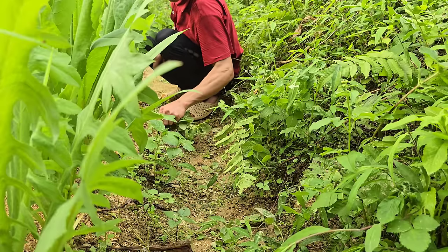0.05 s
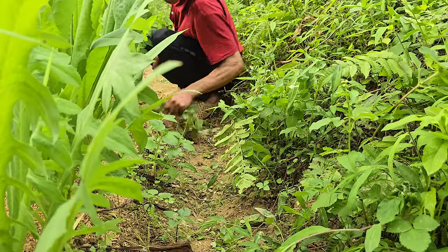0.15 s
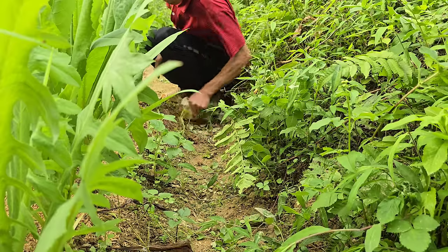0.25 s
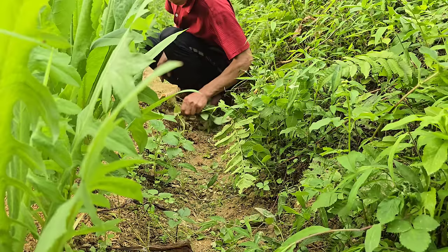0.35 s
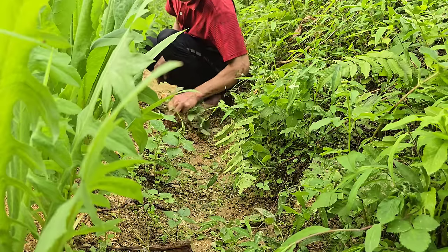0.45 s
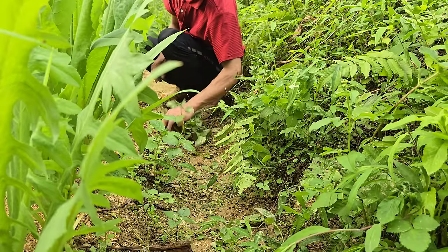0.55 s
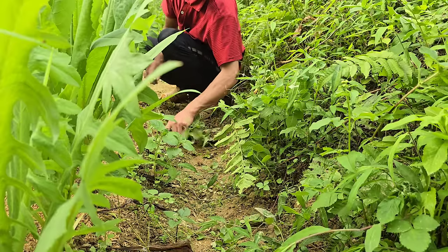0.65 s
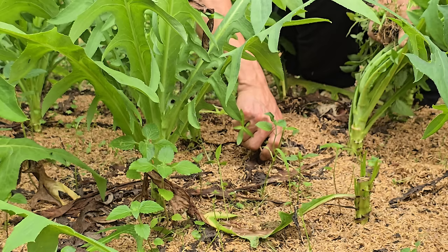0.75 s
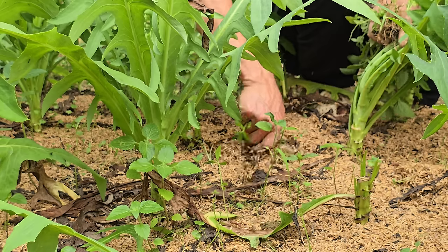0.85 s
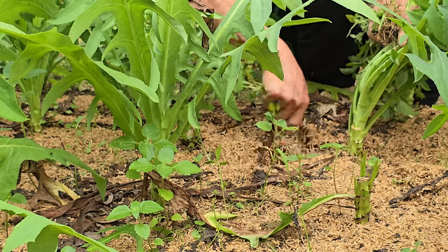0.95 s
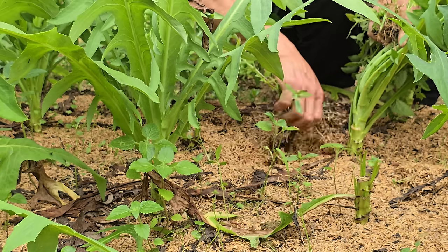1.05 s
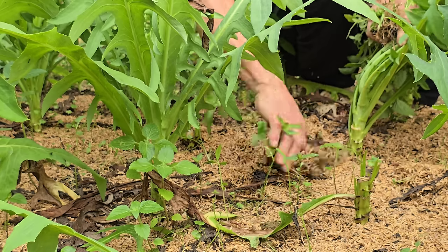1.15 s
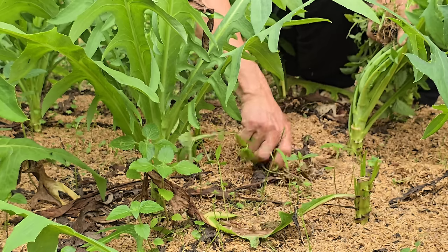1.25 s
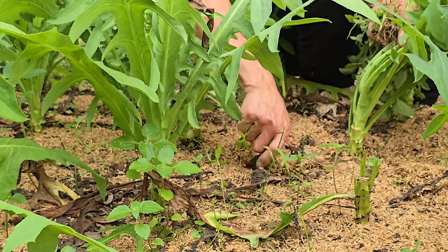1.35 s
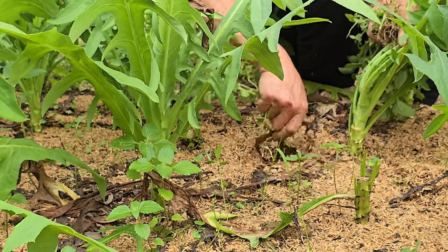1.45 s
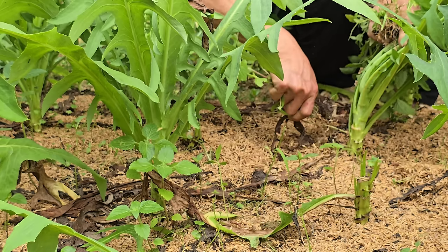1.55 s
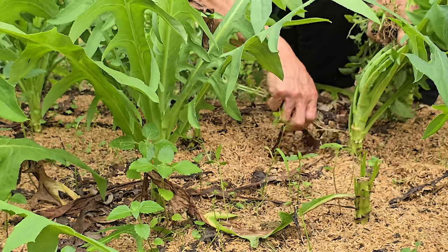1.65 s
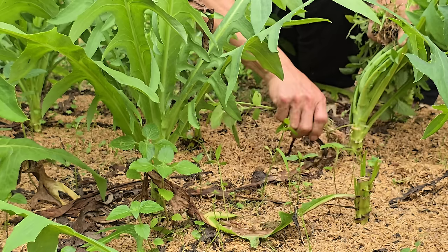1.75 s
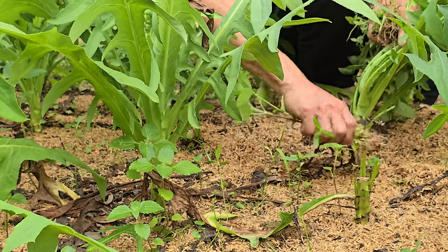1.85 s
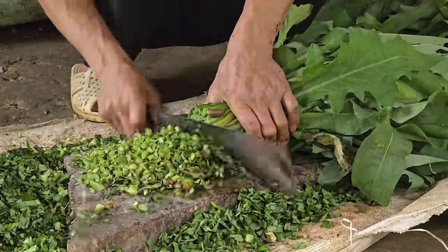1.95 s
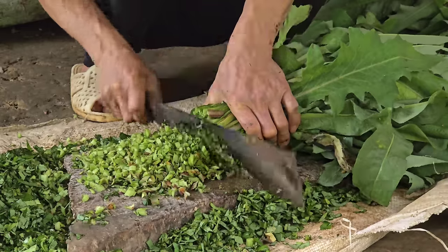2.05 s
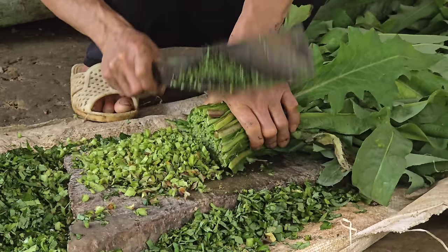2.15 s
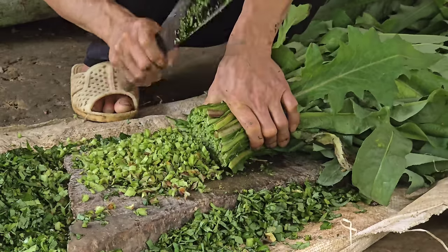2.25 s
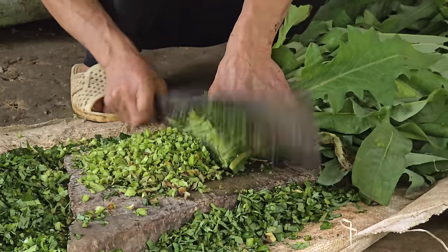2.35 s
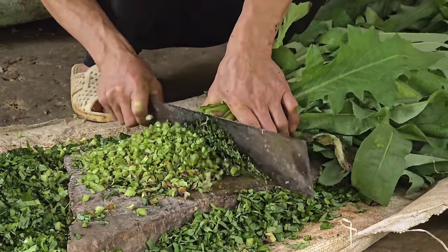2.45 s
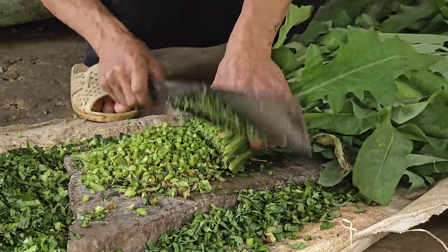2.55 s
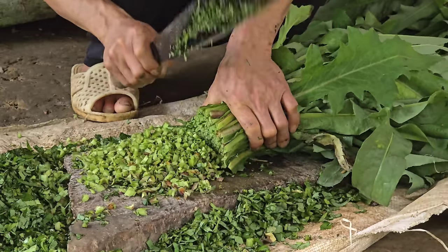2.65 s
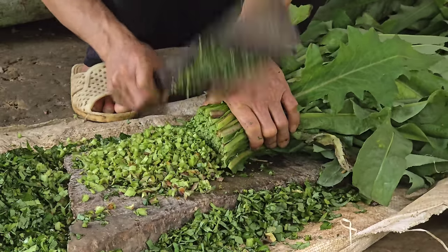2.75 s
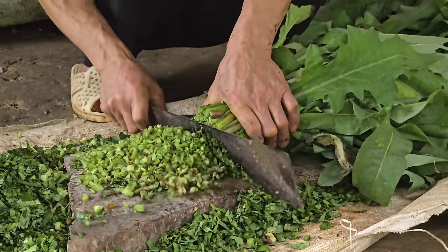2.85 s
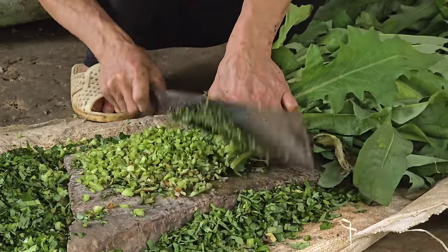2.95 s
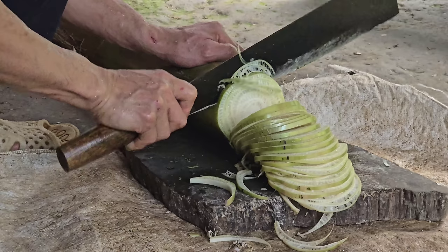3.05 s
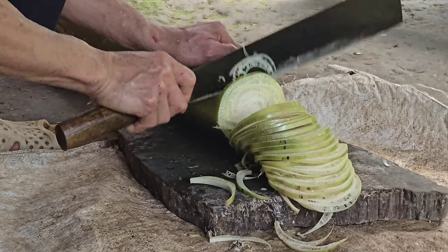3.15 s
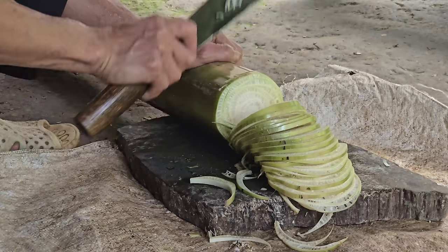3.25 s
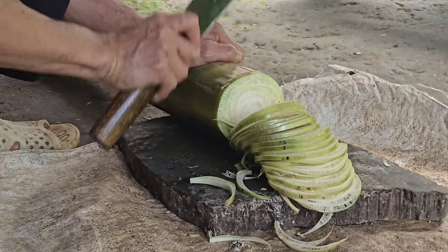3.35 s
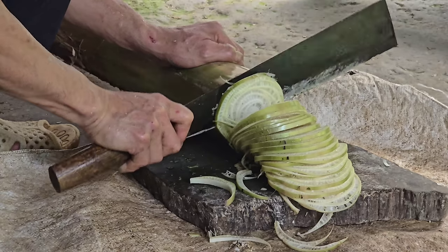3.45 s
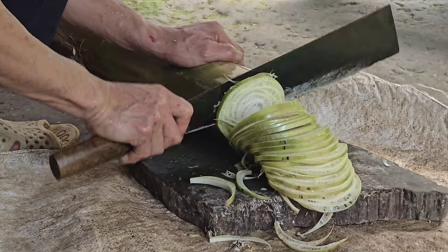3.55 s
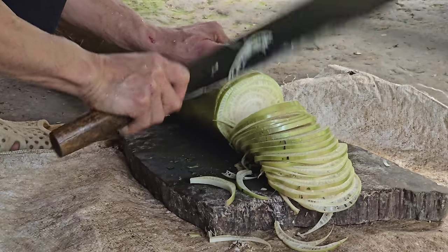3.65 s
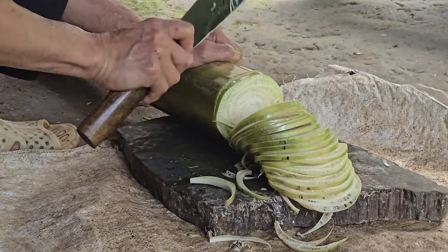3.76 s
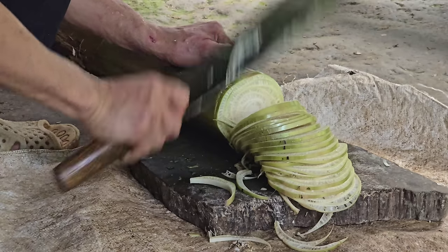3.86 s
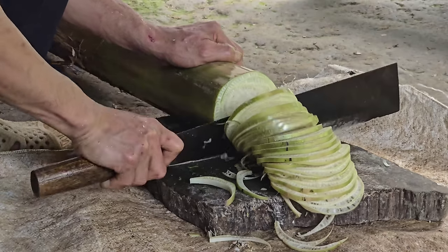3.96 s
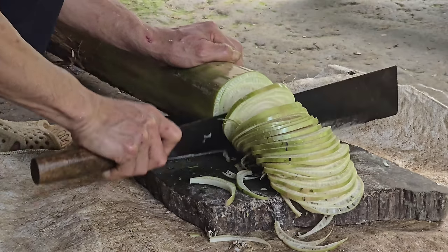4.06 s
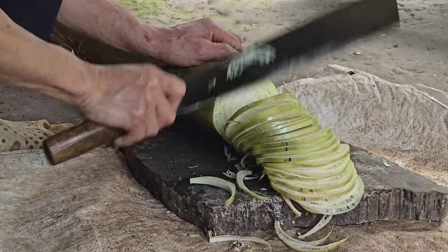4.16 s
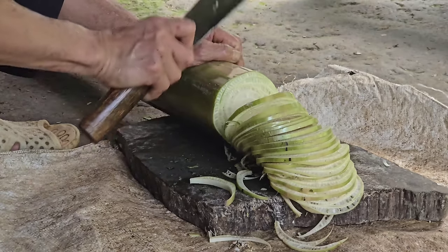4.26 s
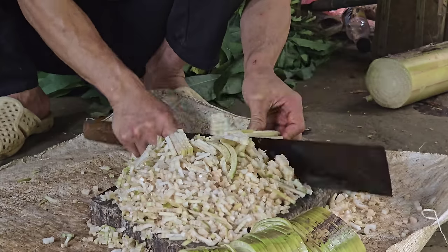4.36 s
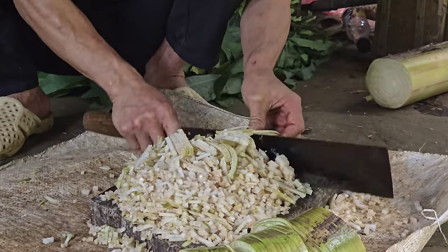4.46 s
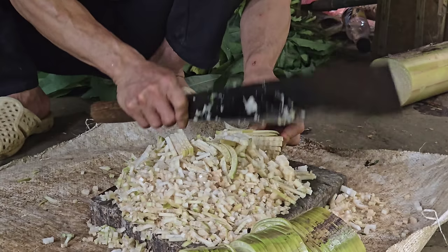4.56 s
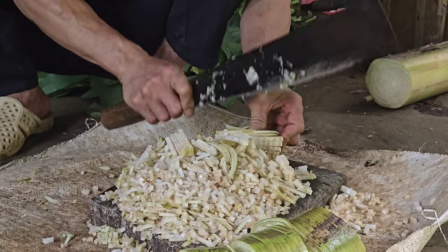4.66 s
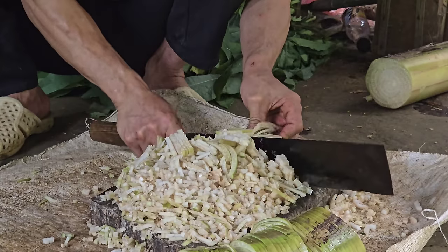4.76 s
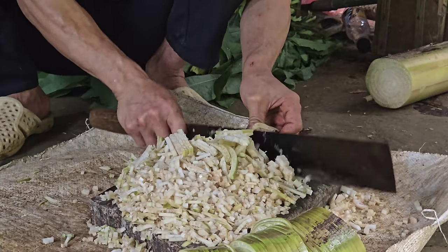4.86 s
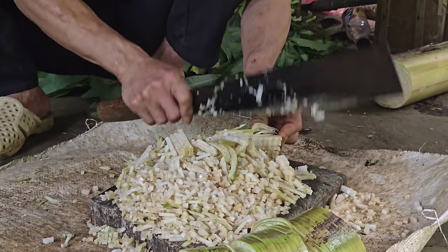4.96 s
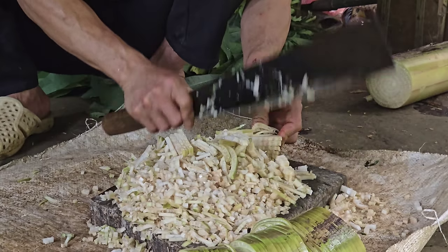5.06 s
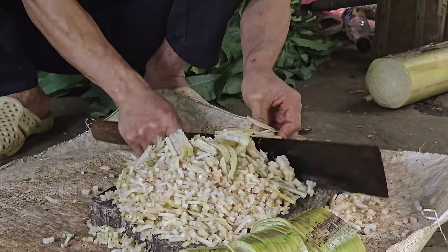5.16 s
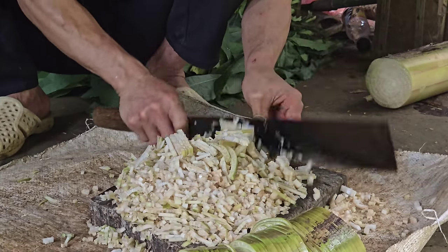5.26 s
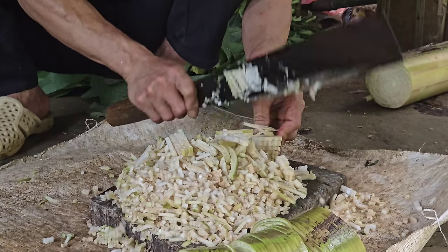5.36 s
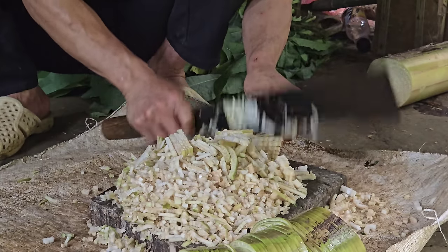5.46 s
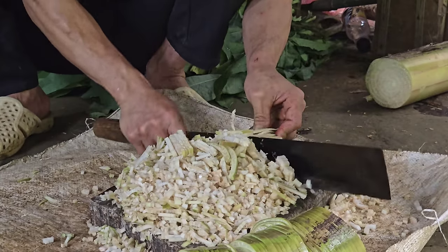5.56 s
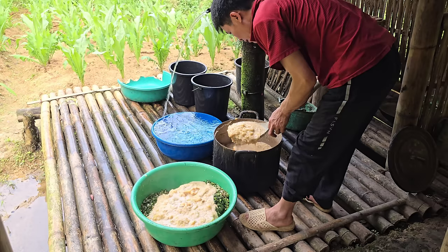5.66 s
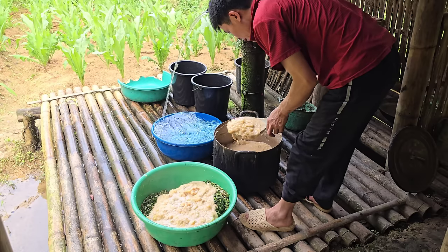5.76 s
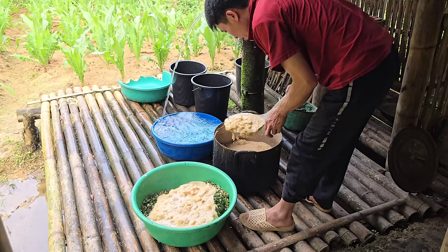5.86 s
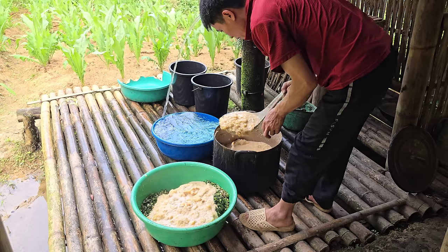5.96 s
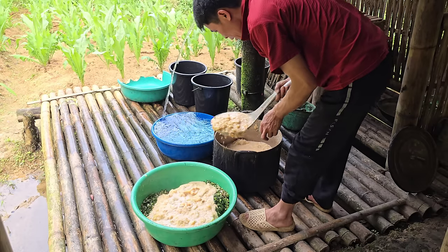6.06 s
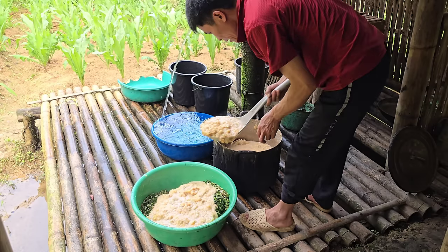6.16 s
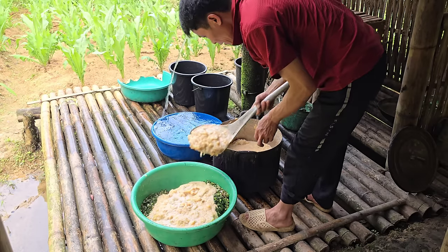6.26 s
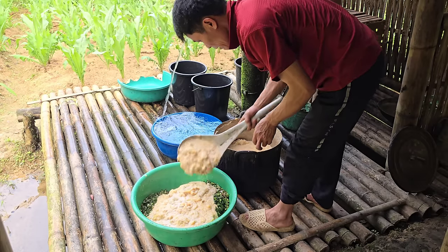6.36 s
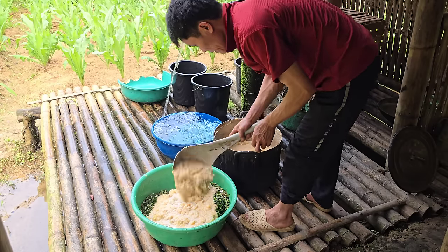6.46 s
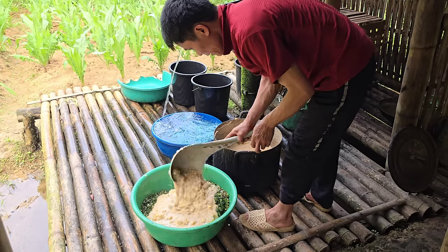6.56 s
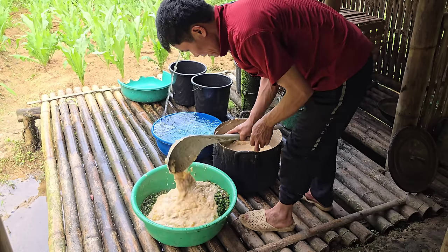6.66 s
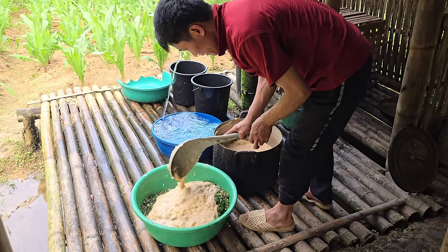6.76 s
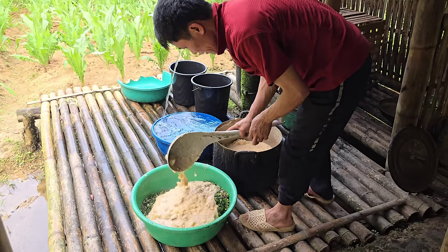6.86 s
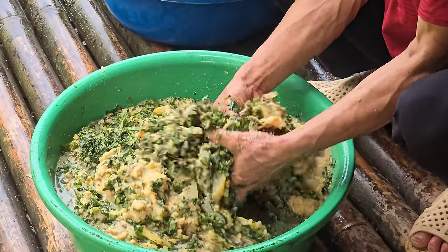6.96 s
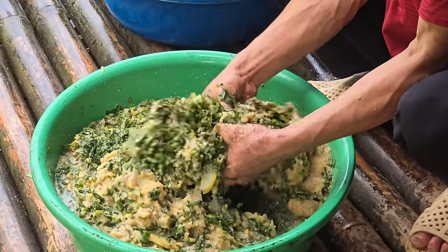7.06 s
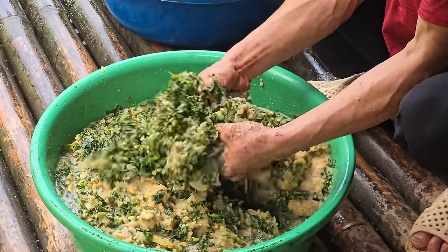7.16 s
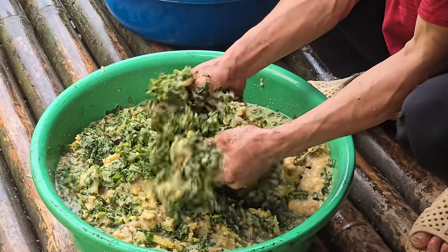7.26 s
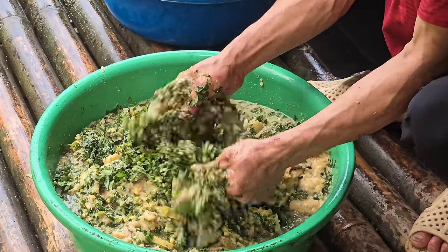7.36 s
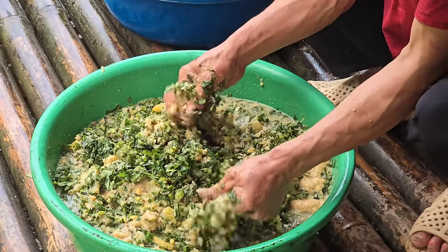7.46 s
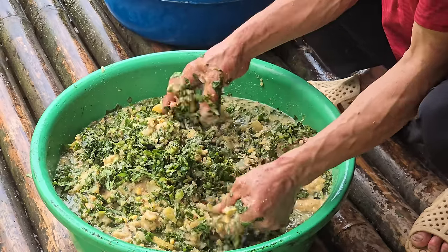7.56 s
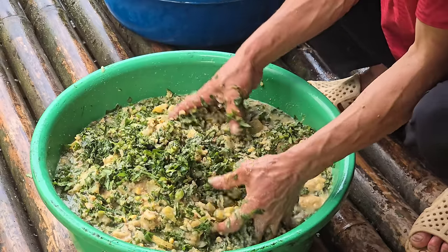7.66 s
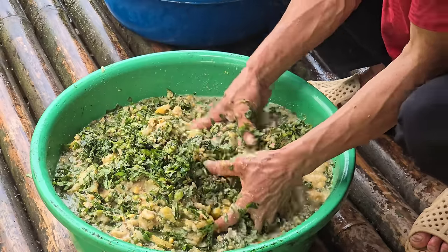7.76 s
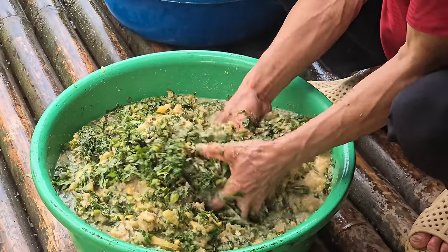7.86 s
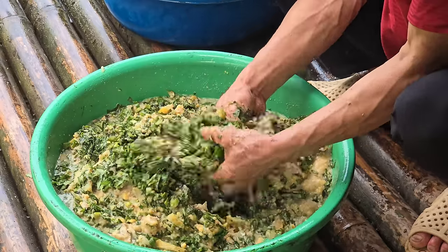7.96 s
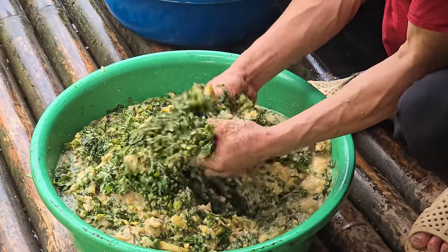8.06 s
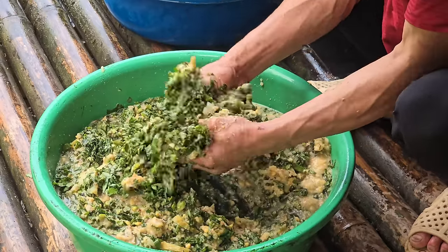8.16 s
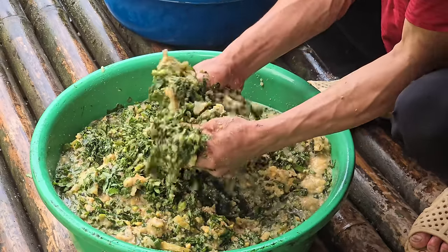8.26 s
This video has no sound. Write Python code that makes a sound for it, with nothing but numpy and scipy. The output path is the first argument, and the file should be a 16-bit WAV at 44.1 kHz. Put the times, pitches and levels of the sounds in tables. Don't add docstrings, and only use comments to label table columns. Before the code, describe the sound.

Weeds rustle among shrilling insects, then a cleaver knocks hard on wooden blocks through leaves and stem, before hands squelch wet mash in a plastic basin.

```python
import sys
import numpy as np
from scipy import signal
from scipy.fft import rfft, irfft, next_fast_len
from scipy.io import wavfile
from scipy.ndimage import uniform_filter1d, map_coordinates

SR = 44100
rng = np.random.default_rng(int(sys.argv[2]) if len(sys.argv) > 2 else 0)


def boost_factor(decibels):
    exponent = np.asarray(decibels, float) / 20
    return 10 ** exponent


def generate_wav(signal):
    frames = np.transpose(np.atleast_2d(signal))
    scaled = np.clip(frames, -1, 1) * 32767
    pcm = np.round(scaled).astype(np.int16)
    wavfile.write(sys.argv[1], SR, pcm)


N = 366471

# [start t/s, spectrum [f/Hz, level/dB per Hz]]
PLACES = [
    (0, [(13, -42), (22, 8.5), (139, -3), (742, -15.5), (2230, -19.5), (4400, -25), (9060, -19), (13500, -33.5)]),
    (.9, [(45, -16), (108, -27), (193, -2.5), (344, -8.5), (1250, -2), (3020, -9.5), (4310, -17), (15700, -29)]),
    (2.14, [(13, -41.5), (22, -14), (247, -6), (417, -14.5), (1220, -22.5), (1600, -18), (2500, -12.5), (15700, -19.5)]),
    (3.24, [(13, -47.5), (76, 3), (168, -0.5), (373, -11), (900, -18), (3100, -21.5), (5680, -30), (15700, -38.5)]),
    (4.6, [(22, -52), (118, -13), (247, -8.5), (335, -18.5), (630, -21), (1060, -21), (3660, -17), (15700, -23.5)]),
    (5.75, [(22, -38), (108, -49), (168, -37), (198, -1), (284, -10.5), (665, -5), (2000, -8.5), (15700, -29)]),
    (7.085, [(22, -48), (128, -15.5), (241, 0.5), (453, -15), (1400, -13.5), (5370, -16.5), (6510, -21.5), (11900, -21)]),
]
# [t/s, peak level/dB, rattle level/dB, edge click level/dB, thump level/dB]
LEAF_BLOWS = [(2.0307, -5.5, -11, -8.5, -17), (2.8960, 0, -13.5, -32, -20)]
STEM_BLOWS = [(3.5158, -19, 1, -32, -8), (4.0012, -1.5, -9.5, -16, -14)]
MINCE_BLOWS = [(4.485, -9.5, -7.5, -30, -10), (4.8702, -16.5, -12, -21, -29),
               (4.8727, -1.2, -14.5, -13, -24.5), (5.2406, -17.5, -10, -23, -29),
               (5.2454, 0.8, -11.5, -20.5, -23.5), (5.6147, -22, -9, -27, -31),
               (5.6214, -0.1, -13, -29, -31)]
# [t/s, level/dB]
EFFORT = [(5.75, -60), (5.85, -52), (7.075, -51), (7.095, -41), (7.6, -42), (7.75, -40), (7.88, -43),
          (8.31, -41)]
LADLING_S, KNEADING_S = EFFORT[0][0], PLACES[-1][0]


def chopping():
    # [t/s, peak level/dB, rattle level/dB, edge click level/dB, thump level/dB]
    twig_blows = [(.2195, -26, -6.5, 3, -8)]
    # [f/Hz, width/Hz, level/dB]
    leaf_block = [(300, 7.2, 0), (460, 100, 4.5), (750, 34, 3.5), (953, 87, -1), (1180, 240, -5.5),
                  (1510, 23, -8), (1650, 30, -13), (2050, 46, -13), (2260, 77, -12.5), (2800, 49, -13),
                  (3540, 90, -25)]
    stem_block = [(137, 10, -8), (524, 19, -4.5), (857, 8.1, -6), (1010, 9.4, -22.5), (1100, 66, -11.5),
                  (1400, 180, -13.5), (1600, 20, -38), (1975, 26, -25), (2200, 35, -30.5), (3750, 34, -44)]
    mince_block = [(426, 18, 0), (569, 17.4, 7), (735, 6.7, -11), (847, 69, -13.5), (1032, 16, -2),
                   (1314, 74, -7), (1527, 66, -16), (2000, 14, -27), (2200, 8.7, -24), (2330, 18, -17.5),
                   (2640, 20, -32), (2900, 25, -16.5), (3600, 40, -31.5), (3840, 32, -28.5)]
    twig = knocks(twig_blows, leaf_block, t60=0.035, harder_db=28)
    leaves = knocks(LEAF_BLOWS, leaf_block, t60=0.15)
    stem = knocks(STEM_BLOWS, stem_block, t60=0.11)
    mince = knocks(MINCE_BLOWS, mince_block, t60=0.11)
    return twig + leaves + stem + mince


def knocks(blows, block, t60, harder_db=0):
    out, t = np.zeros((2, N)), np.arange(SR // 4) / SR
    hard_hz, softer = 9000, 1.27

    def wood(f):
        modes = sum((-1) ** k * boost_factor(db) * resonance(hz, width + 30)(f) for k, (hz, width, db) in enumerate(block))
        crack = boost_factor(-32) * resonance(2400, 2200)(f) ** 2
        return modes + crack

    for s, db, rattle_db, click_db, thump_db in blows:
        noise = rng.standard_normal((3, len(t)))
        own = filtered(noise[:2], lambda hz: hz / (hz + 2000))
        uneven = lumps(106, 1.6, count=len(t))
        late = 1 - np.exp(-t / .006)
        rattle = noise[2] + 4.7 * own * boost_factor(-30 * t / t60)
        push = boost_factor(rattle_db - 13.0 - 60 * t / t60) * late * uneven * rattle
        push[:, 0] += 1
        dull_hz = hard_hz * boost_factor(softer * (db + harder_db))
        ring = filtered(push, lambda f: wood(f) / (1 + 1j * f / dull_hz) ** 2)
        click = boost_factor(click_db - 60 * t / .012) * filtered(own, resonance(2800, 3000))
        thump = late * boost_factor(thump_db - 60 * t / 0.059) * np.sin(2 * np.pi * 115 * t * (1 - 3.2 * t))
        add(out, s, boost_factor(db) * (ring / np.abs(ring).max() + click + thump))
    return out


def crunch():
    # [t/s, length/s, level/dB, brightness/dB per octave, fade t60/s]
    cuts = [(2.019, 0.015, -26.5, -5.5, 0.29), (2.441, 0.027, -22, -0.5, 0.12),
            (2.884, 0.0082, -22, -4, 0.14), (3.518, 0.02, -16.5, 1, 0.13), (4.494, 0.031, -16, 1, 0.12)]
    rustles = [(.54, 0.016, -46.5, 3, 0.15), (0.728, 0.054, -66, -1, .15), (1.28, .052, -42.5, 1.5, .15),
               (1.484, 0.0188, -44.5, 1, .04), (2.281, 0.064, -61.5, -5.5, .11), (2.413, .03, -50, 2, .05),
               (3.481, 0.031, -44, 0.5, .05), (3.95, 0.028, -37.5, -4, 0.053),
               (4.003, 0.028, -31.5, -4.2, 0.16), (4.287, 0.033, -49.5, -3.5, .11),
               (4.436, 0.064, -37, -2, .05), (4.832, .012, -40, -0.5, .05),
               (5.21, 0.0094, -36.5, -0.5, .05), (5.587, 0.0083, -42.5, -0.5, 0.046)]
    bites = [(3.977, 0.02, -17.5, 0, 0.11), (4.839, .033, -29.5, -1.5, .12), (5.22, 0.02, -33.5, -2.5, .15),
             (5.592, 0.028, -35, -1, .093)]
    # [f/Hz, level/dB per Hz]
    cells = [(35, -38.5), (60, -29), (163, -5), (299, -5), (561, -3.5), (959, -9), (1490, -5.5),
             (2270, -12), (3070, -10), (4460, -12.5), (15700, -15)]
    swell, bite = 0.66, 0.24
    spray_hz, spray_shorter = 3000, 0.88
    out, t = np.zeros((2, N)), np.arange(SR // 5) / SR
    rows = [(*row, swell) for row in cuts + rustles] + [(*row, bite) for row in bites]
    for s, length, db, bright_db, t60, rise in rows:
        grain = boost_factor(1.5 * rng.standard_normal(len(t) // 40 + 1).repeat(40)[:len(t)])

        def colour(hz):
            return boost_factor(along(cells, hz) + bright_db * np.log2((hz + 300) / 3000))

        def shape(life):
            return np.clip(t / (rise * length), 0, 1) * boost_factor(-60 * np.maximum(t - length, 0) / life)

        pair = filtered(grain * rng.standard_normal((2, len(t))), colour)
        low = filtered(pair, lambda hz: 1 / (1 + (hz / 1500) ** 2))
        both = unit(pair - low + 0.56 * low.mean(0))
        body = filtered(both, lambda hz: 1 / (1 + (hz / spray_hz) ** 4))
        spray = both - body
        add(out, s, boost_factor(db) * (shape(t60) * body + shape(spray_shorter * t60) * spray))
    return out


def mash():
    out, t = np.zeros((2, N)), np.arange(SR // 8) / SR
    for s, db, hz, t60, width in squelches():
        noise = rng.standard_normal((3, len(t)))
        tone = .32 * np.sin(2 * np.pi * hz * t * (1 + 1.5 * t))
        burst = (tone + noise[2] + .6 * noise[:2]) * lumps(200, 3, count=len(t))
        burst = burst * np.clip(t / .002, 0, 1) * boost_factor(-60 * t / t60)
        burst[:, round(.003 * SR)] += 7 * noise[:2, 0]
        sound = filtered(burst, lambda f: resonance(hz, width)(f) + 0.088 * resonance(1.3 * hz, 2200)(f))
        add(out, s - .003, boost_factor(db - 2.5) * sound / np.abs(sound).max())
    add(out, LADLING_S, boost_factor(-0.3) * gurgle(LADLING_S, KNEADING_S, broader=3.7))
    add(out, KNEADING_S, boost_factor(1.1) * gurgle(KNEADING_S, N / SR, broader=1))
    return out


def squelches():
    # [t/s, peak level/dB, f/Hz]
    ticks = [(0.569, -39, 2400), (0.999, -36, 2800), (1.319, -39, 3100), (1.418, -37, 2630),
             (1.598, -38, 1230), (1.608, -44, 1040), (1.803, -45, 1020), (1.9, -45, 3000),
             (2.299, -35.5, 2420)]
    ladle_pops = [(5.738, -38.5, 2080), (5.785, -35, 2040), (5.856, -22, 1940), (5.929, -35, 2260),
                  (5.995, -36, 2200), (6.024, -37.5, 2360), (6.16, -27.5, 2200), (6.255, -39, 4300),
                  (6.298, -35, 2200), (6.372, -33, 1600), (6.388, -32, 2430), (6.446, -33, 1420),
                  (6.471, -25.5, 2030), (6.533, -38, 3070), (6.567, -32.5, 4410), (6.58, -37, 1300),
                  (6.612, -32, 1210), (6.618, -33, 2000), (6.64, -29.5, 2280), (6.708, -34, 2280),
                  (6.759, -37, 2440), (6.864, -34.5, 2060), (7.034, -31.5, 2850), (7.053, -28, 2220)]
    finger_pops = [(7.164, -32, 3150), (7.193, -35, 3900), (7.283, -27.5, 1184), (7.317, -27, 3850),
                   (7.39, -30.5, 710), (7.555, -37, 2760), (7.366, -26, 1112), (7.69, -25.5, 730),
                   (7.767, -16, 1443), (7.77, -16.5, 2123), (7.813, -27.5, 1600), (7.965, -24, 1270)]
    tears = [(7.445, -28, 2600), (7.728, -24, 1500), (7.958, -28, 2600), (7.986, -22, 3000),
             (8.035, -27, 1500), (8.069, -25, 2700), (8.122, -27, 750), (8.131, -27, 2800)]
    # [t/s, peak level/dB]
    low_pops = [(7.095, -28), (7.101, -22.5), (7.111, -17.5), (7.145, -25), (7.46, -32), (7.54, -24),
                (7.641, -32.5), (7.674, -25), (7.787, -18.5), (7.917, -23), (8.18, -30), (8.229, -21.5),
                (8.256, -25.5)]
    high_pops = [(7.152, -33), (7.264, -22), (7.301, -19), (7.316, -23), (7.445, -23.5), (7.572, -28),
                 (7.592, -40), (7.628, -30), (7.653, -29), (7.693, -25.5), (7.728, -20), (7.802, -20),
                 (7.858, -27.5), (7.94, -24.5), (8.073, -26.5), (8.143, -26), (8.195, -22), (8.209, -17),
                 (8.287, -20)]
    hollow_hz = 170
    detune = 0.0093

    def hollow(rows, hz, t60):
        return [(s, db, hz * (1 + detune * rng.standard_normal()), t60, hollow_hz) for s, db in rows]

    free = [(*row, 0.08, 360) for row in ladle_pops]
    free += [(*row, 0.076, hollow_hz) for row in finger_pops]
    free += [(*row, 0.082, hollow_hz) for row in ticks]
    free += [(*row, 0.07, 900) for row in tears]
    return free + hollow(low_pops, 1420, 0.13) + hollow(high_pops, 2086, 0.045)


def gurgle(start, stop, broader):
    # [f/Hz, width/Hz, level/dB]
    pockets = [(226, 150, -18), (717, 95, -4.5), (1210, 49, -7), (1432, 40, 2.5), (2057, 32, 5),
               (2670, 170, -6.5), (3690, 93, -6)]
    part = slice(round(start * SR), round(stop * SR))
    squeezed, out = squeezing()[part], 0
    for hz, width, db in pockets:
        noise = rng.standard_normal((3, len(squeezed)))
        push = (noise[2] + .7 * noise[:2]) * lumps(70, 3.5, count=len(squeezed)) * squeezed
        out = out + boost_factor(db) * filtered(push, resonance(hz, broader * width))
    return boost_factor(curve(EFFORT)[0][part]) * unit(out)


def squeezing():
    # [t/s, length/s, level over the effort/dB]
    squeezes = [(5.833, .05, 10), (5.924, .03, 0.5), (5.99, 0.08, 3), (6.15, .04, -5), (6.38, 0.023, 4),
                (6.446, 0.03, -3), (6.563, .05, -4), (6.624, 0.029, -22), (6.85, .05, 2),
                (7.087, 0.039, -4.5), (7.137, 0.035, 1.5), (7.26, .09, 3.5), (7.37, 0.048, -6),
                (7.432, .035, 0), (7.474, 0.034, 2), (7.532, 0.04, 1.5), (7.62, 0.036, -6),
                (7.683, 0.029, 2), (7.767, 0.082, 9), (7.83, 0.077, -6.5), (7.896, 0.034, 0),
                (7.937, 0.042, 6), (8.027, .03, 7), (8.073, 0.028, 7), (8.126, 0.02, -2),
                (8.191, 0.042, 3.5), (8.24, 0.052, -3)]
    between_db, rise_s, release_t60 = -6, 0.0051, 0.076
    out, t = np.full((1, N), boost_factor(between_db)), np.arange(SR // 4) / SR
    for s, length, db in squeezes:
        release_db = -60 * np.maximum(t - length, 0) / release_t60
        add(out, s, boost_factor(db + release_db) * np.clip(t / rise_s, 0, 1))
    return out[0]


def fizz():
    place, size, strength = rng.random((150, 3)).T
    s = LADLING_S + place * (N / SR - LADLING_S)
    octaves = 0.49 * np.log(size / (1 - size) + 0.053) / 2
    hz = 2200 * 2 ** octaves
    db = curve(EFFORT, s)[0] + 11 - 1.5 * np.log(strength)
    return bubbles(s, db, hz, 38 / hz, 0.17, count=2500)


def snaps():
    # [t/s, peak level/dB]
    drops = [(5.9346, -27), (6.065, -26.5), (6.169, -25.5), (6.387, -28.5), (6.4768, -26.5), (6.6607, -28),
             (6.756, -28.5), (6.851, -28.5), (6.889, -26.5), (7.191, -36), (7.261, -43), (7.3003, -26),
             (7.3173, -20.5), (7.367, -22.5), (7.4035, -17.5), (7.6944, -18.5), (7.7817, -39),
             (7.8012, -39), (7.9492, -21.5), (8.1319, -47), (8.195, -42), (8.226, -23.5)]
    # [t/s, peak level/dB, brightness/dB per octave]
    splats = [(5.8533, -22.5, 1.6), (6.565, -17, 0), (6.5965, -31, 4), (8.0504, -22, -6.5),
              (8.0726, -16, -3)]
    spits = [(6.219, -41, -1.5), (6.256, -25, 3), (7.952, -34, 11), (7.977, -36, 11), (8.005, -43, 0.5),
             (8.224, -40, 8), (8.3, -38, 14)]
    # [f/Hz, level/dB per Hz]
    splash = [(300, -54), (900, -6.5), (2000, -1), (4000, -3), (8000, -7), (15700, -13.5)]
    # [t/s, peak level/dB]
    clicks = [(7.0353, -29), (7.1028, -23), (7.3024, -24), (7.3665, -21), (7.6955, -22), (7.815, -18.5),
              (8.0345, -23), (8.0738, -14.5)]
    drip_bright_db, snap_bright_db = 3.5, 1.1
    out, t = np.zeros((2, N)), np.arange(SR // 12) / SR
    rows = [(s, db, drip_bright_db if s < KNEADING_S else snap_bright_db, 0.031) for s, db in drops]
    rows += [(*row, 0.1) for row in splats]
    rows += [(*row, 0.014) for row in spits]
    for s, db, bright_db, t60 in rows:
        white = rng.standard_normal((2, len(t)))
        noise = filtered(white, lambda hz: boost_factor(bright_db * np.log2((hz + 300) / 3000)))
        add(out, s - .001, boost_factor(db - 9.5 - 60 * t / t60) * np.clip(t / 0.0021, 0, 1) * noise)
    out = filtered(out, lambda hz: boost_factor(along(splash, hz) + 8.0))
    for s, db in clicks:
        add(out, s, boost_factor(db + 2 - 60 * t / .0025) * np.sin(2 * np.pi * 3000 * t))
    return out


def soil():
    # [t/s, peak level/dB, f/Hz]
    clods = [(0.559, -57.5, 151), (0.614, -43, 353), (0.752, -42.5, 516), (0.886, -57, 199),
             (0.982, -35, 202), (1.252, -41, 433), (.96, -43, 740), (1.306, -46, 450), (1.311, -45, 213),
             (1.32, -46, 900), (1.392, -40, 450), (1.393, -43, 1020), (1.46, -43, 1050), (1.5, -41, 455),
             (1.52, -44, 1030), (1.56, -51, 216), (1.631, -44, 473), (1.66, -48, 480), (1.726, -52, 450),
             (1.92, -40, 550), (1.392, -43, 175), (1.5, -44, 194), (1.73, -38.5, 195), (1.759, -40, 506),
             (1.842, -43, 196), (1.896, -38.5, 200), (2.295, -53, 526), (3.246, -44.5, 177),
             (3.379, -45, 287)]
    basin_bumps = [(7.1, -54, 95), (7.2, -46, 94), (7.29, -48, 102)]
    s, db, hz = np.transpose(clods + basin_bumps)
    return bubbles(s - .003, db + 10.0, hz, 11 / hz, -0.017, count=4000)


def insects():
    # [t/s, throbbing level/dB, steady level/dB]
    choruses = [(0, -51, -66), (.86, -50.5, -65), (.95, -52, -53.5), (2.1, -69, -60), (2.16, -88, -84)]
    # [t/s, level/dB]
    hum = [(.93, -57.5), (1, -57.5), (1.8, -54), (1.95, -92)]
    t = np.arange(N) / SR

    def band(hz, width):
        noise = rng.standard_normal((2, N))
        return unit(filtered(noise, lambda f: np.exp(-((f - hz) / width) ** 2)))

    throbbing_db, steady_db = curve(choruses)
    throb = 1 + 0.55 * np.sin(2 * np.pi * 16.8 * t)
    throbbing = (band(7850, 550) + band(9200, 700)) * throb / 2.0
    steady = band(5350, 290) + band(10200, 600) + 0.52 * band(3140, 300) + 0.88 * band(14800, 600)
    pump = boost_factor(curve(hum)) * np.sin(2 * np.pi * 62 * t)
    return boost_factor(throbbing_db) * throbbing + boost_factor(steady_db) * steady + pump


def surroundings():
    # [lowest f/Hz, highest f/Hz, centre f/Hz]
    air_bands = [(25, 300, 120), (300, 4000, 1300), (4000, 15500, 8000)]
    hz, t, z = signal.stft(rng.standard_normal((2, N)), SR, nperseg=2048, noverlap=1536)
    colours = np.array([along(spectrum, hz) for _, spectrum in PLACES]).T
    colour = colours[:, place_at(t)]
    share = [10 * np.log10(boost_factor(2 * colour[(hz > lo) & (hz <= hi)]).sum(0) / len(hz)) for lo, hi, _ in air_bands]
    centres = [centre for *_, centre in air_bands]
    blend = np.array([along(list(zip(centres, row)), hz) for row in np.eye(len(centres))])
    field = uniform_filter1d(rng.standard_normal(z.shape[1:]), size=16, axis=0)
    field = uniform_filter1d(field, size=4, axis=1)
    flicker_db = 1.3 * rng.standard_normal(len(t)) * (hz[:, None] > 1500)
    patchy_db = along([(80, 1), (300, 2.8), (2500, 2.8), (6000, 1.4)], hz)[:, None]
    level_db = blend.T @ (air_db(t) - np.array(share))
    gain = boost_factor(colour + level_db + patchy_db * unit(field) + flicker_db)
    return signal.istft(stereo(z * gain, hz[:, None]), SR, nperseg=2048, noverlap=1536)[1][:, :N]


def air_db(t):
    # [rumble level/dB, rustle level/dB, hiss level/dB]
    place_db = [(-58, -58.5, -54.5), (-53, -59, -44), (-65.5, -49.5, -58), (-55, -49, -51.5),
                (-57.5, -48.5, -51.5), (-62.5, -49, -42.5), (-52, -38, -41.5)]
    # [t/s, level over the place/dB]
    stir = [(0, 0.5), (.3, 4), (.85, 0), (.97, 2.5), (1.11, -0.5), (1.9, 0.5), (2.2, 0.9), (3.28, -0.5),
            (3.56, 1), (4.2, -2.5), (5.7, -7), (5.99, -5), (7.05, -4), (7.1, -1.5), (7.27, 0.5), (7.62, 2),
            (7.91, -1), (8.31, -1.5)]
    stir_grows = (0.49, 0.73, 0.84)
    ground_db, ground_t60 = (-33, -34.5, -71), 0.29
    steady = boost_factor(np.transpose(place_db)[:, place_at(t)] + np.outer(stir_grows, curve(stir, t)))
    s, db = np.transpose(LEAF_BLOWS + STEM_BLOWS + MINCE_BLOWS)[:2, :, None]
    answer = np.sum((t > s) * boost_factor(db - 60 * np.abs(t - s) / ground_t60), 0)
    return 20 * np.log10(np.hypot(steady, np.outer(boost_factor(ground_db), answer)))


def place_at(t):
    return np.searchsorted([s for s, _ in PLACES], t, "right") - 1


def bubbles(s, db, hz, t60, glide, count):
    t = np.arange(count) / SR
    rows = rng.standard_normal((len(s), 2))
    shape = boost_factor(-60 * t / t60[:, None]) * (1 - np.exp(-t * hz[:, None] / 2.3))
    phase = 2 * np.pi * hz[:, None] * t * (1 + glide * t / t60[:, None])
    at = (np.round(s * SR).astype(int)[:, None] + np.arange(count)).ravel()
    out = []
    for side in (1, -1):
        gain = boost_factor(db + side * 1.9 * rows[:, 0])[:, None]
        wave = gain * shape * np.sin(phase + side * .5 * rows[:, 1:])
        out.append(np.bincount(at, wave.ravel(), N + count)[:N])
    return np.array(out)


def resonance(hz, width):
    return lambda f: 1j * f * width / (hz * hz - f * f + 1j * f * width)


def lumps(rate, depth_db, count):
    knots = rng.standard_normal(int(count * rate / SR) + 4)
    return boost_factor(depth_db * map_coordinates(knots, [np.arange(count) * rate / SR]))


def stereo(pair, hz):
    # [f/Hz, correlation]
    alike = [(60, 0.79), (180, 0.95), (550, 0.45), (1650, -0.11), (4970, -0.062), (15000, 0.025)]
    turn = np.arccos(np.clip(along(alike, hz), -1, 1)) / 2
    mid, side = pair[0] * np.cos(turn), pair[1] * np.sin(turn)
    return np.array([mid + side, mid - side])


def unit(x):
    return x / np.sqrt(np.mean(x ** 2) + 1e-20)


def along(points, hz):
    f, v = np.transpose(points)
    return np.interp(np.log(hz + 1), np.log(f + 1), v)


def curve(rows, t=None):
    s, *cols = np.transpose(rows)
    at = np.arange(N) / SR if t is None else t
    return np.array([np.interp(at, s, col) for col in cols])


def filtered(x, response):
    m = next_fast_len(x.shape[-1] + 4096)
    return irfft(rfft(x, m) * response(np.fft.rfftfreq(m, 1 / SR)), m)[..., :x.shape[-1]]


def add(out, s, x):
    part = out[:, round(s * SR):][:, :x.shape[-1]]
    part += x[..., :part.shape[1]]


def scene():
    blade = filtered(crunch() + chopping(), lambda hz: (1j * hz / (65 + 1j * hz)) ** 2)
    return surroundings() + insects() + blade + mash() + fizz() + snaps() + soil()


def low_pass(x):
    return signal.sosfilt(signal.butter(12, 16620, fs=SR, output="sos"), x)


def record(dry):
    # [f/Hz, level/dB]
    ports = [(4500, 0), (6700, -1.5), (9000, -0.25), (12000, 0), (15700, 0.8)]
    top_hz, ceiling = 15800, .92
    cut = filtered(dry, lambda hz: (hz < top_hz) * boost_factor(along(ports, hz)))
    held = cut / (1 + np.abs(cut / ceiling) ** 8) ** (1 / 8)
    return low_pass(held)


dry = scene()
out = record(dry)
generate_wav(out)
```